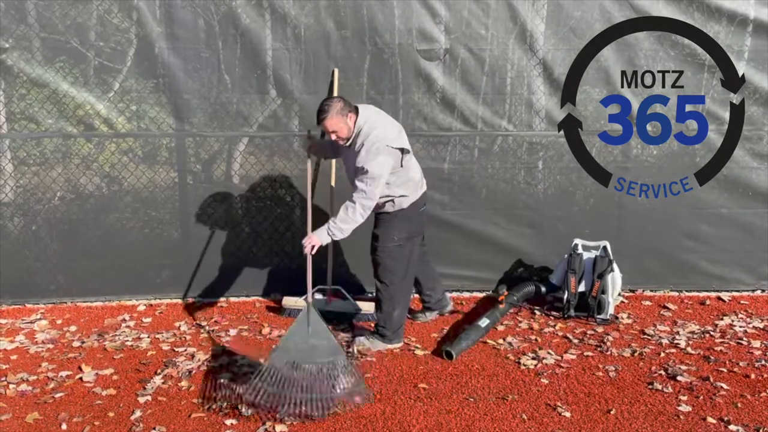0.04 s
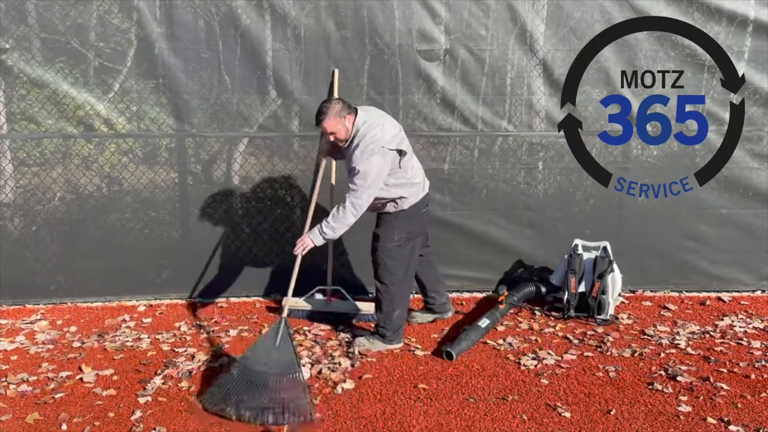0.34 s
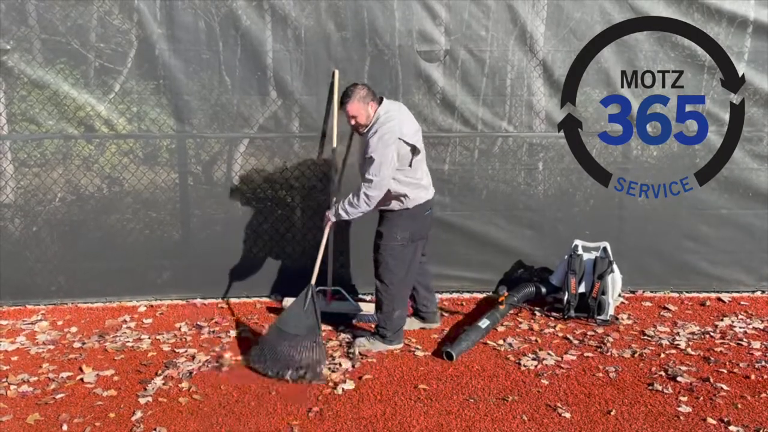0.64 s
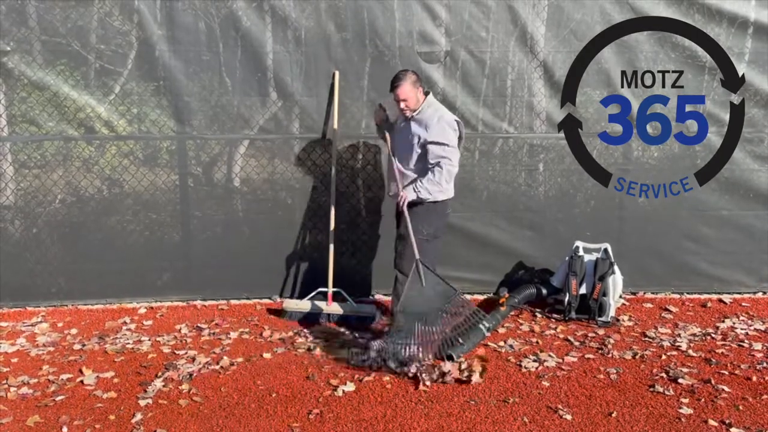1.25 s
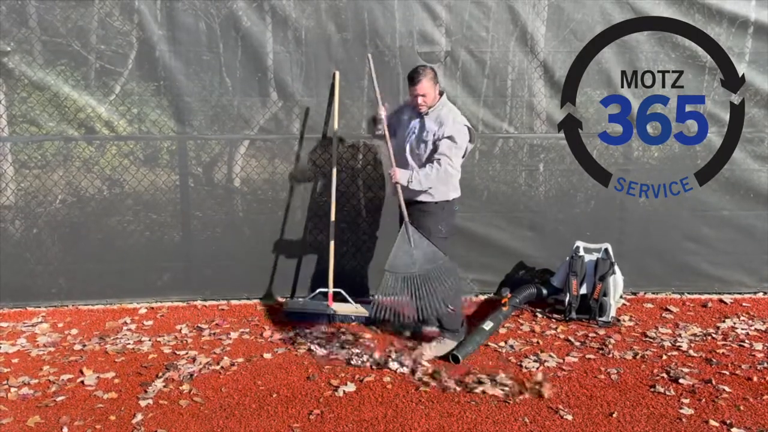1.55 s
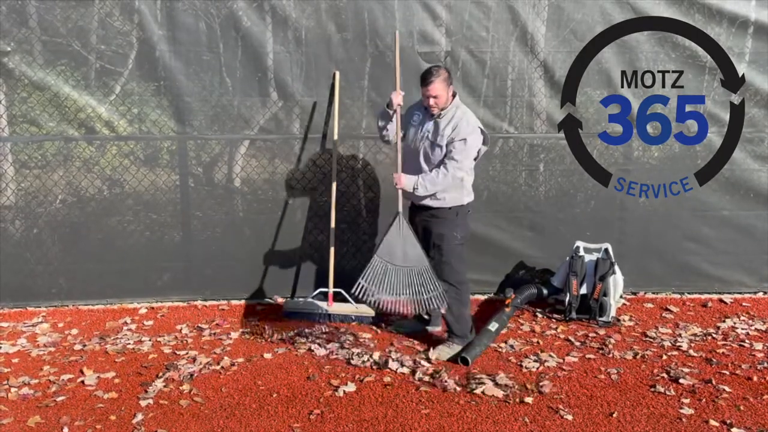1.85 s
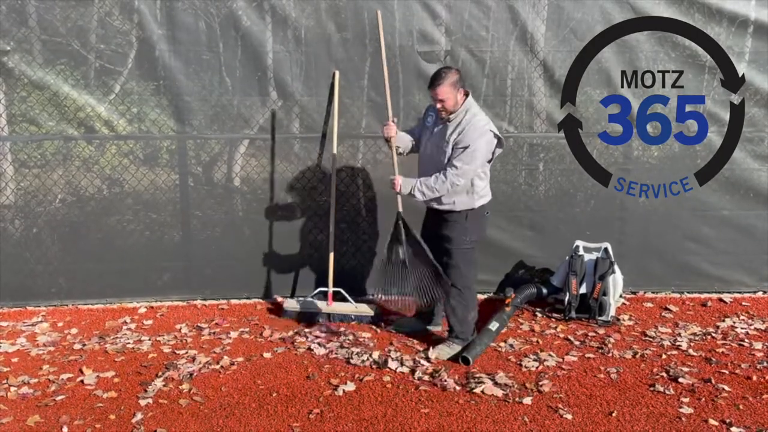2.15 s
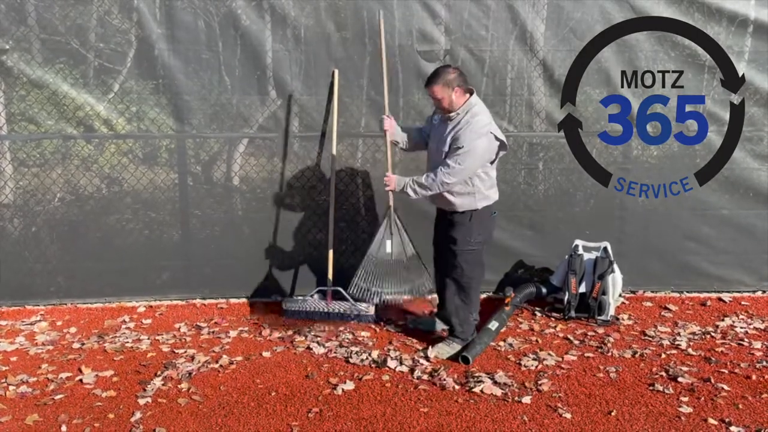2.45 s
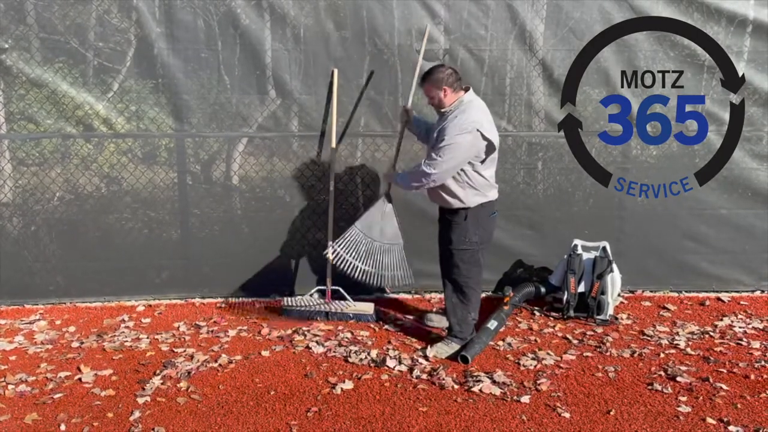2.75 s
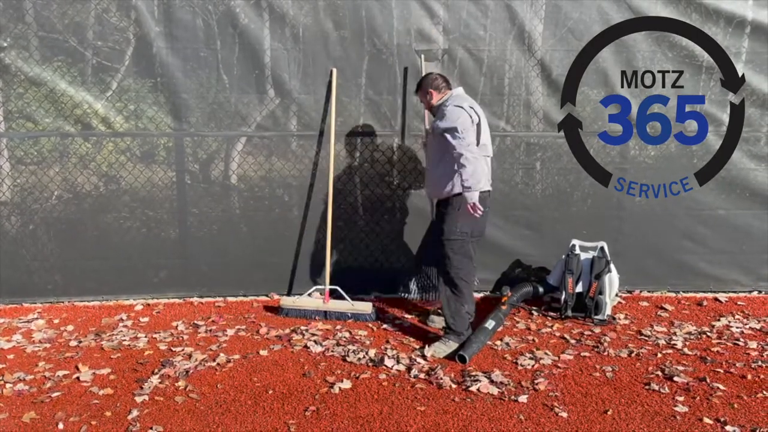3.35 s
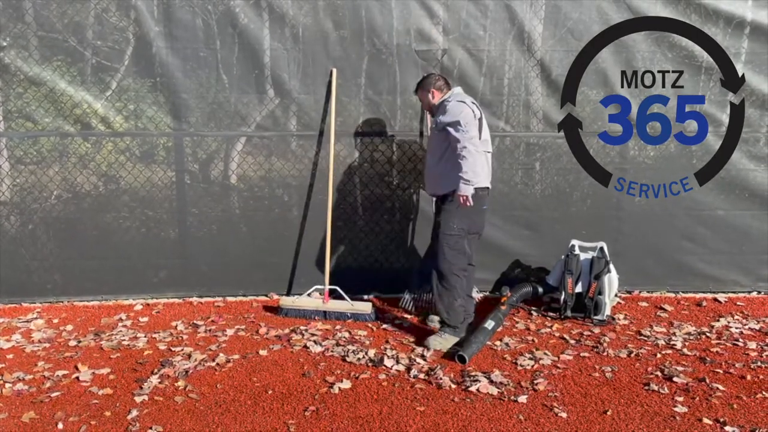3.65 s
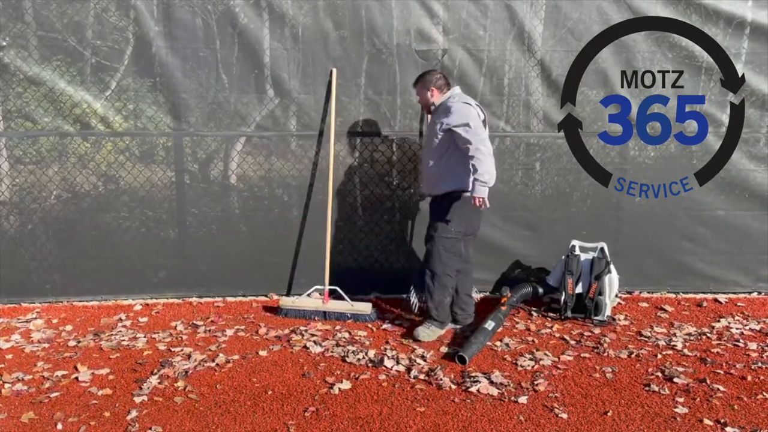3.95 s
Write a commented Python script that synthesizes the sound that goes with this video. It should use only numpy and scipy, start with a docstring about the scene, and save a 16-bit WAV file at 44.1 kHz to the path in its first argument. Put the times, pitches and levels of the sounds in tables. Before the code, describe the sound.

A plastic rake drags dry leaves across artificial turf in one long hissing stroke and a lighter flick. It then clacks a few times and shoes scuff, close by outdoors, over a steady distant drone of traffic and machinery.

```python
"""A plastic fan rake sweeps dry leaves over artificial turf: one long hissing stroke, a lighter flick at 1 s.
From 1.5 s the rake is lifted and turned with a few dry clacks.
Shoes then scuff the turf as it is carried to the fence, with a pause near 3 s.
Throughout, a steady distant drone like traffic and machinery lies under the close raking."""
import sys
import numpy as np
from scipy import signal
from scipy.fft import rfft, irfft, next_fast_len
from scipy.io import wavfile
from scipy.ndimage import uniform_filter1d, map_coordinates

SR = 44100
rng = np.random.default_rng(int(sys.argv[2]) if len(sys.argv) > 2 else 0)


def dump(signal):
    """Clip the signal to [-1, 1] and save it as 16-bit WAV at the path in sys.argv[1]."""
    limited = np.clip(np.atleast_2d(signal).T, -1, 1)
    pcm = np.round(limited * 32767).astype(np.int16)
    wavfile.write(sys.argv[1], SR, pcm)


N = 176400

# grain spectra of turf blades, leaves and snapping leaf edges: f/Hz, relative density/dB
TURF_SPECTRUM = [(1500, -41.5), (4500, -25), (7000, -3.5), (8500, 4.5), (10800, -1.5), (12200, -0.5),
                 (13200, -11.5), (14500, 0.5), (15600, -7.5)]
LEAF_SPECTRUM = [(300, -14.5), (900, -10.5), (2000, 2.5), (2800, -0.5), (3700, -1), (5200, -0.5),
                 (6600, -8), (9000, -14.5), (15000, -22)]
CRACKLE_SPECTRUM = [(500, -16.5), (3500, -2), (7000, 2.5), (11000, -4), (15500, -7.5)]


def sweep(fade_db_per_s=149):
    """Tines flick the plastic blades, sing a little and push crackling leaves ahead of them."""
    # stroke envelope: t/s, turf level/dB, leaf level/dB
    strokes = [(0.115, -74.5, -69), (0.143, -47, -44.5), (0.175, -45.5, -43), (0.21, -38.5, -40),
               (0.225, -45.5, -44.5), (0.255, -37.5, -36), (0.31, -34, -36), (0.44, -34, -36.5),
               (0.58, -38.5, -37.5), (0.975, -41.5, -35.5), (1.16, -56.5, -47.5), (1.29, -48, -41),
               (1.45, -58.5, -50), (1.485, -53.5, -45.5), (1.57, -62.5, -46), (1.72, -69, -62.5)]
    t = np.arange(N) / SR
    knots_s, turf_db, leaf_db = np.transpose(strokes)
    outside_s = np.abs(t - np.clip(t, knots_s[0], knots_s[-1]))
    catch_db = 0.89 * wobble(45.5) - fade_db_per_s * outside_s
    turf_gain = amp(np.interp(t, knots_s, turf_db) + 3.5)
    turf = turf_gain * grains(TURF_SPECTRUM, per_s=9000, spread_db=1.5)
    rustle = grains(LEAF_SPECTRUM, per_s=3000, spread_db=1)
    leaf_gain = amp(np.interp(t, knots_s, leaf_db) + 1 + 0.64 * wobble(59.9))
    leaves = leaf_gain * (rustle + amp(-5.5) * tines() + amp(-12) * crackle())
    return amp(catch_db) * (turf + leaves)


def tines(grip_db=4):
    """Dragged tines ring louder or softer as they grip and slip on the turf."""
    # tine resonances: f/Hz, width/Hz, relative level/dB
    resonances = [(3000, 260, -1.5), (3550, 25, -6.5), (3800, 200, 1.5), (4500, 50, -3.5),
                  (4710, 150, -6.5), (5200, 220, -1.5), (6230, 20, -8.5), (6800, 430, -7.5)]
    out = np.zeros((2, N))
    for centre_hz, width_hz, db in resonances:
        def resonator(hz):
            damping = 1j * hz * width_hz
            return damping / (centre_hz ** 2 - hz ** 2 + damping)
        ring = filtered(rng.standard_normal((2, N)), resonator)
        out += amp(db + grip_db * wobble(22)) * unit(ring)
    return unit(out)


def crackle():
    """Sparse snaps of dry leaf edges."""
    return grains(CRACKLE_SPECTRUM, per_s=120, spread_db=3)


def pings(t60_s=0.018, attack_s=0.00055, phase_step_rad=0.13):
    """A snagged tine springs free with a short, dull ping."""
    # tine releases: t/s, f/Hz, level/dB
    releases = [(0.189, 2980, -24.5), (0.255, 5300, -31), (0.276, 3300, -29), (0.341, 5300, -25),
                (0.367, 6500, -29.5), (0.977, 4030, -22), (0.985, 3750, -23.5), (1.203, 3850, -30.5)]
    out = np.zeros((2, N + SR))
    t = np.arange(SR // 8) / SR
    attack = 1 - np.exp(-t / attack_s)
    for at_s, hz, db in releases:
        start = round(at_s * SR)
        phase = 2 * np.pi * (hz * t + rng.random((2, 1)))
        roughness = phase_step_rad * np.cumsum(rng.standard_normal((2, len(t))), axis=1)
        out[:, start:start + len(t)] += amp(db - 60 * t / t60_s) * attack * np.sin(phase + roughness)
    return out[:, :N]


def clacks(splinter_t60_s=0.0077, shiver_t60_s=0.099, attack_s=0.00016):
    """Each knock: a sharp snap with a splintery edge, a shiver of the tines, the rake's damped ring."""
    # knocks: t/s, level/dB, relative body level/dB, relative shiver level/dB
    knocks = [(0.1394, -26, -6, -22), (1.473, -28, -13, -18), (1.7415, -27.5, -38, -44),
              (1.7632, -32, -30, -39), (1.774, -38, -26, -39), (1.8473, -33, -24, -37),
              (1.9344, -32, -18, -27), (1.948, -36.5, -18, -21), (2.0463, -38.5, -24, -39),
              (2.199, -24.5, 6, -18), (2.2685, -33.5, -8, -24), (2.2948, -29, -6, -32),
              (2.3645, -38.5, -17, -22.5), (3.4378, -35, -26, -40)]
    # fan and handle modes: f/Hz, level/dB, T60/s
    modes = [(190, -4.5, .06), (283, -1, 0.074), (700, -8, .016), (872, 2, 0.092), (1700, -0.5, .03),
             (2230, -5, .016), (2650, -14, .016), (3680, -10.5, 0.016), (4180, -7, .016), (4840, -9, .012)]
    # colour of a plastic snap: f/Hz, gain/dB
    snap_colour = [(500, -5), (3500, 2.5), (7000, 1.5), (11000, -4), (15500, -5)]
    snaps, rattle, rings = np.zeros((3, 2, N + SR))
    t = np.arange(SR // 4) / SR
    attack = 1 - np.exp(-t / attack_s)
    for at_s, db, body_db, shiver_db in knocks:
        start = round(at_s * SR)
        span = slice(start, start + len(t))
        snaps[0, start] = amp(db + 12)  # mid channel only
        splinter = amp(-4 - 60 * t / splinter_t60_s)
        shiver = amp(shiver_db - 60 * t / shiver_t60_s)
        rattle[:, span] += amp(db) * (splinter + shiver) * rng.standard_normal((2, len(t)))
        ring = sum(amp(mode_db - 60 * t / t60_s) * np.sin(2 * np.pi * (hz * t + rng.random((2, 1))))
                   for hz, mode_db, t60_s in modes)
        rings[:, span] += amp(db + body_db) * attack * ring
    return filtered((snaps + rattle)[:, :N], lambda hz: amp(along(snap_colour, hz))) + rings[:, :N]


def scuffs():
    """Shoes and tines rub briefly on turf and leaves."""
    # rubs: t/s, level/dB, 20 dB rise/s, 20 dB fall/s, relative turf level/dB
    rubs = [(1.655, -56.5, .02, .04, 2.5), (1.79, -58, .04, .08, -0.5), (1.92, -49.5, 0.13, 0.18, -5),
            (2.27, -47, 0.098, 0.1, -4), (2.365, -58, .03, .04, -2.5), (2.54, -56, 0.13, 0.21, -7.5),
            (2.83, -72, .05, .053, -2), (3.36, -69, .08, .12, 0), (3.505, -45, 0.075, 0.13, -7.5),
            (3.585, -57.5, .04, .06, -6.5), (3.74, -63.5, .09, .18, -2), (3.925, -52, .06, 0.089, -3)]
    t = np.arange(N) / SR
    turf = grains(TURF_SPECTRUM, per_s=5900, spread_db=4.5)
    leaves = grains(LEAF_SPECTRUM, per_s=5000, spread_db=1.5)
    out = np.zeros((2, N))
    for peak_s, db, rise_s, fall_s, turf_db in rubs:
        envelope = amp(db - 20 * np.maximum((peak_s - t) / rise_s, (t - peak_s) / fall_s))
        out += envelope * (leaves + amp(turf_db) * turf)
    return out


def stir():
    """Cloth and leaves rustle faintly, pausing while the rake is held still."""
    # rustle envelope: t/s, level/dB
    envelope = [(0, -55.5), (0.11, -64), (1.6, -60), (2, -62), (2.45, -66.5), (2.68, -65), (2.78, -83),
                (3.28, -82), (3.45, -64), (3.8, -70), (4, -66)]
    level_db = np.interp(np.arange(N) / SR, *np.transpose(envelope)) + 1.2 * wobble(25)
    return amp(level_db) * grains(CRACKLE_SPECTRUM, per_s=4000, spread_db=2.8)


def fence(x, t60_s=.09, delay_s=.004, gain_db=-15):
    """Short, weak reflection from the screened fence."""
    t = np.arange(SR // 4) / SR
    tail = rng.standard_normal((2, len(t))) * amp(-60 * t / t60_s) * (t > delay_s)
    return amp(gain_db) * signal.fftconvolve(x, tail / np.linalg.norm(tail[0]), axes=1)[:, :N]


def drone():
    """Far traffic and machinery: dull bed, narrow humps, two swelling moans, faint hum."""
    # broad bed: f/Hz, relative density/dB
    bed_spectrum = [(20, -17.5), (35, -11.5), (52, 1.5), (70, -3), (90, 2), (140, 0), (210, -6), (245, -10),
                    (400, -10.5), (540, -12), (760, -5), (1000, -6), (1200, -9.5), (1650, -12), (2200, -19),
                    (3200, -31), (5000, -44.5), (6800, -64.5), (15000, -76)]
    # steady bands: f/Hz, half-width/Hz, level/dB
    humps = [(140, 34, -41), (206.4, 11, -40.5), (1370, 37, -42), (1708, 39, -44.5)]
    # moaning bands: f/Hz, half-width/Hz, level/dB
    moans = [(480.8, 23.5, -38), (865, 64, -31)]
    # moan swells: t/s, low band gain/dB, high band gain/dB
    swells = [(0.15, -3, -.5), (0.42, 3.5, -1), (0.7, -3.5, 2.5), (0.92, -1.5, -1.5), (1.3, 0, 1),
              (1.75, 4, 1.5), (2.35, -3, .5), (2.7, -1.5, -1), (3.28, 5, -.5), (3.54, -0.5, -2),
              (3.72, 5.5, -.5), (4, 1, -1.5)]
    # machine tones: f/Hz, level/dB
    hum = [(151.7, -42), (1802, -55)]
    # overall drift: t/s, gain/dB
    drift = [(0, 0.5), (1, 0.54), (1.9, 0), (2.7, -0.5), (4, -0.2)]
    # left-right likeness: f/Hz, coherence
    coherence = [(50, 1), (150, 0.91), (300, 0.77), (490, 0.61), (620, 0.51), (880, 0.22), (1200, 0.14),
                 (1390, -0.15), (1600, 0.01), (2500, 0.21), (3600, 0.53), (6000, 0.87)]
    # stereo tilt: f/Hz, left minus right/dB
    balance = [(30, -1), (140, -3), (300, -1.5), (700, 1.2), (1500, 0.5), (4000, 2), (7000, 1)]
    t = np.arange(N) / SR
    out = amp(-24.5 + .5 * wobble(7.03)) * coloured(rng.standard_normal((2, N)), bed_spectrum)
    for centre_hz, half_width_hz, db in humps:
        out += amp(db) * steady_band(centre_hz, half_width_hz)
    knots_s, *swells_db = np.transpose(swells)
    for (centre_hz, half_width_hz, db), swell_db in zip(moans, swells_db):
        out += amp(db + np.interp(t, knots_s, swell_db)) * steady_band(centre_hz, half_width_hz)
    for hz, db in hum:
        out[0] += amp(db) * np.sqrt(2) * np.sin(2 * np.pi * hz * t + .6 * wobble(3))
    gain = amp(np.interp(t, *np.transpose(drift)))
    return panned(gain * spread(out, coherence), balance)


def steady_band(centre_hz, half_width_hz, window_s=.2):
    """Narrow noise band held near rms 1."""
    band = filtered(rng.standard_normal((2, N)),
                    lambda hz: 1 / (1 + ((hz - centre_hz) / half_width_hz) ** 2))
    power = np.abs(uniform_filter1d(band ** 2, int(window_s * SR), axis=1))
    return band / np.sqrt(power + 1e-20)


def grains(spectrum, per_s, spread_db):
    """Two streams of tiny snaps, random in time and size, at rms 1."""
    hits = rng.random((2, N)) < per_s / SR
    sizes = amp(spread_db * np.minimum(rng.exponential(size=(2, N)), 5))
    return coloured(hits * sizes * rng.choice([-1, 1], (2, N)), spectrum)


def amp(db):
    """Decibels to gain."""
    return 10 ** (np.asarray(db) / 20)


def unit(x):
    """Scale to rms 1."""
    return x / np.sqrt(np.mean(x ** 2) + 1e-20)


def along(points, hz):
    """Interpolate (f/Hz, value) points on a log axis."""
    knots_hz, values = np.transpose(points)
    return np.interp(np.log(hz + 1), np.log(knots_hz + 1), values)


def wobble(knots_per_s):
    """Smooth random curve, rms about 1."""
    knots = rng.standard_normal(int(N * knots_per_s / SR) + 4)
    return map_coordinates(knots, [np.arange(N) * knots_per_s / SR])


def filtered(x, response):
    """Apply a complex frequency response."""
    size = next_fast_len(N + SR // 2)
    return irfft(rfft(x, size) * response(np.fft.rfftfreq(size, 1 / SR)), size)[..., :N]


def coloured(x, spectrum):
    """Shape by a spectrum, at rms 1."""
    return unit(filtered(x, lambda hz: amp(along(spectrum, hz))))


def spread(pair, coherence):
    """Mix two unrelated signals as mid and side to a given left-right coherence."""
    def weights(hz):
        angle = np.arccos(np.clip(along(coherence, hz), -1, 1)) / 2
        return np.array([np.cos(angle), np.sin(angle)])
    mid, side = filtered(pair, weights)
    return np.array([mid + side, mid - side])


def panned(x, balance):
    """Tilt a stereo pair left or right by frequency."""
    return filtered(x, lambda hz: amp(along(balance, hz) * np.array([[.5], [-.5]])))


def scene():
    """The raking, slightly left, in front of the drone."""
    # left-right likeness of near sounds: f/Hz, coherence
    coherence = [(300, 0.78), (1400, .1), (2800, .35), (3700, .7), (4500, .5), (5100, 0.17), (6000, .5),
                 (7400, 1)]
    # their stereo tilt: f/Hz, left minus right/dB
    balance = [(500, 0), (2000, 1), (3500, 2), (5500, 3), (6900, 0), (15000, 0)]
    near = sweep() + pings() + scuffs() + clacks() + stir()
    return panned(spread(near + fence(near), coherence), balance) + drone()


def record(dry):
    """Band-limited stereo, left and right in or out of phase by frequency in the treble."""
    # left-right phase: f/Hz, phase/half turns
    stereo_phase = [(5500, 0), (6800, .15), (7550, 1), (8900, 1), (9500, 1.35), (10400, 2), (12700, 2),
                    (13200, 2.4), (13750, 3)]
    top_hz = 15650

    def response(hz):
        phase_rad = np.pi * along(stereo_phase, hz) * np.array([[.5], [-.5]])
        return np.exp(1j * phase_rad) * (hz < top_hz)
    return filtered(dry, response)


dry = scene()
out = record(dry)
dump(out)
```